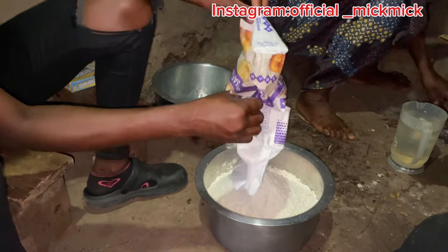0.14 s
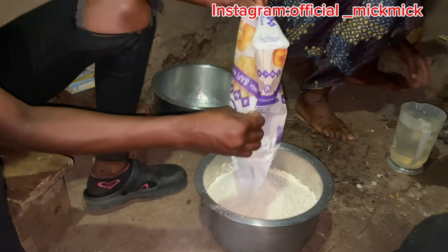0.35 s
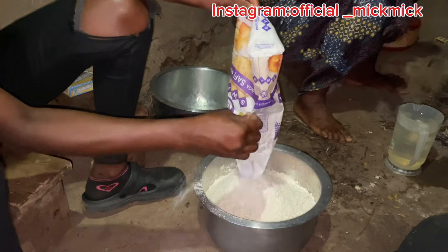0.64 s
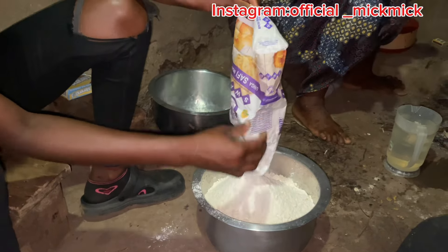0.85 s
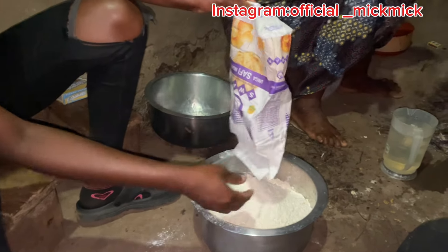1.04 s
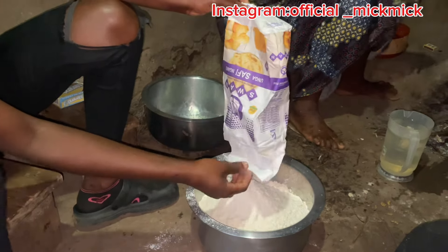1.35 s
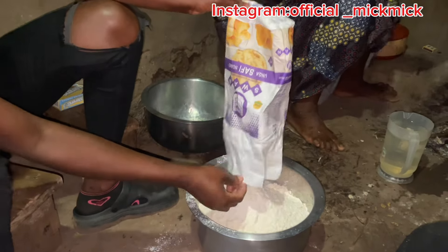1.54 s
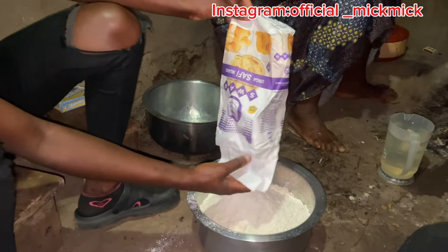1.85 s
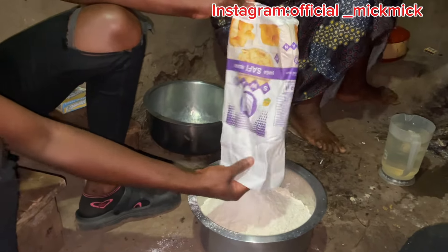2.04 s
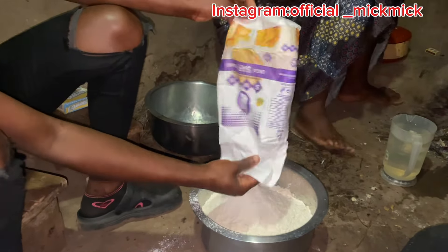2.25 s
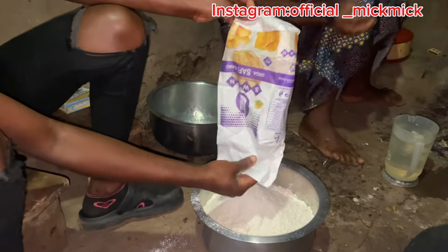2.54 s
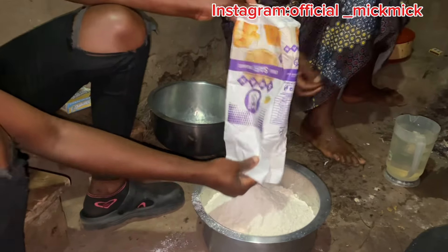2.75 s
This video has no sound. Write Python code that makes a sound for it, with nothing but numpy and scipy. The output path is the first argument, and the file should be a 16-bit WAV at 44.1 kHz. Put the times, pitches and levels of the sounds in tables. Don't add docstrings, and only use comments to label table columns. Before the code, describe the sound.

Close crisp paper rustling and snapping with dull hollow booms from the bag, a short lull with thin distant chirps, then busier crinkling to a loud final shake, heard by a phone in a small hard-walled room.

```python
import sys
import numpy as np
from scipy import signal
from scipy.fft import rfft, irfft, next_fast_len
from scipy.io import wavfile
from scipy.ndimage import uniform_filter1d, map_coordinates

SR = 44100
rng = np.random.default_rng(int(sys.argv[2]) if len(sys.argv) > 2 else 0)


def makeup_ratio(level_db):
    decades = np.asarray(level_db, float) / 20
    return 10 ** decades


def wav_out(sig):
    wavfile.write(sys.argv[1], SR, np.round(np.clip(np.atleast_2d(sig).T, -1, 1) * 32767).astype(np.int16))


N = 127890
T = np.arange(N) / SR

# pitch in Hz, width in Hz, level in dB.
BAG = [(72.7, 8, -7), (165, 11.6, 8), (279, 29.4, -6.5), (392, 83, 1), (449, 317, -8)]


def paper():
    # frequency in Hz, level in dB.
    paper_colour = [(300, -16.5), (700, -0.5), (1100, 6.5), (3000, 1.5), (5000, 1), (7800, -2), (13500, -4)]
    open_rustle, hollow_rustle = rustle()
    bare = open_rustle + snaps()
    return 1.81 * filtered(bare, lambda f: makeup_ratio(along(paper_colour, f))) + hollow_rustle


def rustle():
    # peak in seconds, level in dB, rise in seconds, t60 in seconds.
    shakes = [(.002, -61.5, 0.012, 0.18), (0.051, -44, 0.06, 0.18), (.085, -61.5, 0.11, 0.087),
              (.2, -84, 0.015, 0.05), (0.229, -38.5, 0.052, 0.12), (0.409, -46.5, 0.1, 0.15),
              (0.495, -51, 0.035, 0.14), (0.516, -38, 0.049, 0.13), (0.753, -64, 0.15, 0.12),
              (.885, -75.5, 0.01, 0.058), (1.301, -59.5, 0.094, 0.32), (1.343, -68, 0.0043, 0.053),
              (1.457, -46, 0.069, 0.13), (1.497, -52, 0.009, 0.052), (1.662, -74, 0.0067, 0.26),
              (1.714, -58, 0.015, 0.14), (1.779, -63, 0.18, 1), (1.925, -56, 0.029, 0.18),
              (2.004, -41.5, 0.065, 0.26), (2.043, -43, 0.054, 0.098), (2.224, -45, 0.09, 0.13),
              (2.266, -50, 0.21, 0.023), (2.348, -37.5, 0.064, 0.11), (2.469, -54, 0.075, 0.022),
              (2.514, -44.5, 0.11, 0.067), (2.618, -37, 0.095, 0.13), (2.718, -47.5, 0.026, 0.039),
              (2.757, -38.5, 0.073, 0.085), (2.866, -30, 0.067, 0.08)]
    # time in seconds, level in dB.
    wall_freedom = [(0, 3.5), (1.2, -11), (1.95, 2), (2.06, 1), (2.14, -5), (2.9, -8.5)]
    dull_hz, top_hz = 2500, 7820
    wall_hz, wall_gain, hollow_db = 883, 2.18, 12.5

    grains = crackle(hiss=0.073)
    full = grains * sum(makeup_ratio(db) * swell(s, rise, t60) for s, db, rise, t60 in shakes)
    late = grains * sum(makeup_ratio(db) * swell(s, 0.46 * rise, 1.45 * t60) for s, db, rise, t60 in shakes)

    dull = filtered(full, lambda f: 1 / (1 + (f / dull_hz) ** 2))
    bright = filtered(late, lambda f: 1j * f / (dull_hz + 1j * f) / (1 + (f / top_hz) ** 2))
    freed = full * makeup_ratio(np.interp(T, *np.transpose(wall_freedom)))
    wall = filtered(freed, lambda f: wall_gain * peak(f, wall_hz, wall_hz / 10))
    hollow = makeup_ratio(hollow_db) * filtered(full, resonances(BAG[2:]))
    return dull + wall + bright, hollow


def snaps():
    # start in seconds, peak in dB, pitch in Hz, t60 in seconds, rise in seconds.
    creases = [(0.0243, -44, 2220, 0.056, .002), (0.0315, -38, 2040, 0.048, .004),
               (.192, -71, 1500, 0.038, .001), (0.21, -51, 2500, .05, .006), (.221, -22, 3780, 0.058, .005),
               (.371, -33.5, 1680, 0.09, .006), (0.483, -42, 3400, 0.042, .004),
               (0.5036, -28.5, 2900, .08, .005), (0.741, -54, 2790, .08, 0.0067),
               (0.8033, -57, 4060, 0.073, .001), (1.2593, -50, 1520, 0.073, .005),
               (1.3207, -35.5, 3230, 0.1, .001), (1.3913, -39, 1740, 0.021, .0005),
               (1.4322, -31, 2780, 0.087, .001), (1.445, -34.5, 2680, 0.13, .003),
               (1.6042, -44, 3170, 0.045, .0005), (1.6128, -49, 4950, 0.048, .001),
               (1.6428, -39, 3330, 0.047, .0005), (1.6529, -38, 3920, 0.048, .001),
               (1.7287, -29, 2380, 0.039, .001), (1.8298, -43.5, 2350, 0.044, .0005),
               (1.9, -40.5, 3270, 0.1, 0.0034), (1.9671, -37.5, 2200, 0.076, .001),
               (1.9755, -27.5, 2800, 0.02, .001), (2.0166, -27, 1850, 0.071, .002),
               (2.1837, -36, 1550, 0.12, 0.0022), (2.324, -44, 1400, 0.055, 0.0017),
               (2.339, -23, 2200, 0.044, .003), (2.4428, -40, 1185, 0.057, .0005),
               (2.498, -58, 2300, .05, .002), (2.594, -32.5, 2500, 0.066, .003),
               (2.5996, -28.5, 3100, 0.066, .002), (2.619, -32.5, 2920, 0.086, .003),
               (2.715, -50, 4460, .06, .003), (2.73, -43, 3100, 0.035, .001),
               (2.7427, -48, 2280, 0.036, .001), (2.84, -28, 3500, .05, 0.0048),
               (2.8607, -18, 3260, 0.065, .002)]
    snap_db, tick = -8.5, 0.5
    ring_gain, ring_q, ring_share = 3.7, 12.2, 0.85
    overtone_gain = 0.2

    tearing = crackle(hiss=0.64)
    ratios = rng.uniform(1.1, 3.3, (len(creases), 3))
    out = np.zeros(N)
    for (s, db, hz, t60, rise), ratio in zip(creases, ratios):
        cut = slice(round(s * SR), round(s * SR) + SR // 4)
        burst = (tearing * swell(s + rise, rise, t60))[cut].copy()
        burst[round(rise * SR)] += tick
        brief = burst * makeup_ratio(-60 * T[:len(burst)] / (ring_share * t60 + 0.0058))

        def broad(f):
            return (1j * f / (0.5 * hz + 1j * f)) ** 2 / (1 + 1j * f / (3 * hz))

        def panel(f):
            overtones = sum(peak(f, r * hz, hz / ring_q) for r in ratio)
            return ring_gain * (peak(f, hz, hz / ring_q) + overtone_gain * overtones)

        out[cut] += makeup_ratio(db + snap_db) * (filtered(burst, broad) + filtered(brief, panel))
    return out


def crackle(hiss):
    grains_per_s, spread_db = 3200, 3.5
    chance, sign, size = rng.random((3, N))
    sizes = makeup_ratio(-spread_db * np.log(size + 0.0036))
    clicks = (chance < grains_per_s / SR) * np.sign(sign - 0.5) * sizes
    return unit(unit(clicks) + hiss * rng.standard_normal(N))


def bag_boom():
    # start in seconds, level in dB, pitch in Hz.
    booms = [(.044, -43, 431), (.048, -41.5, 283), (.075, -45.5, 336), (.193, -51, 375), (.221, -38, 398),
             (.222, -39, 292), (.38, -47, 302), (.417, -37.5, 370), (.507, -32, 279), (.508, -61, 406),
             (.508, -22, 878), (.6, -52.5, 201), (.64, -56, 277), (1.008, -63, 292), (1.258, -57.5, 410),
             (1.474, -61, 320), (1.44, -69, 790), (1.915, -43, 950), (1.975, -33, 880), (2.008, -35, 370),
             (2.03, -32, 930), (2.045, -35.5, 332), (2.193, -40.5, 392), (2.312, -46.5, 360),
             (2.353, -46.5, 254), (2.58, -41, 383), (2.74, -43.5, 291), (2.86, -35.5, 400)]
    return drum(booms, cycles=23, flutter=0.26, cavity=BAG[2:])


def room_thud():
    # start in seconds, level in dB, pitch in Hz.
    thuds = [(.226, -48, 66), (.51, -36, 165), (.518, -35.5, 81.2), (.64, -59, 73.7), (.84, -57, 67.6),
             (1.094, -68, 232), (1.096, -62, 473), (1.1, -69, 95), (1.3, -61.5, 71.6), (1.47, -53.5, 79),
             (1.74, -58.5, 83), (2.012, -39.5, 165), (2.228, -40.5, 98), (2.32, -39.5, 164),
             (2.35, -41, 117), (2.52, -43, 83.5), (2.588, -37.5, 77.2), (2.742, -42, 77.6),
             (2.845, -33, 181), (2.847, -29, 77)]
    # peak in seconds, level in dB, rise in seconds, t60 in seconds.
    pumps = [(.07, -62, .06, 1), (0.248, -47, 0.055, 0.2), (.4, -61, .04, 0.26), (.56, -52.5, 0.13, 0.62),
             (.86, -71, 0.097, 0.46), (1.3, -64.5, 0.099, 0.51), (1.49, -55.5, 0.063, 0.18),
             (1.77, -68, 0.21, .4), (2.041, -41.5, 0.035, 0.37), (2.24, -43.5, 0.098, 0.26),
             (2.361, -46.5, .06, 0.32), (2.53, -55, 0.11, 0.22), (2.61, -46, 0.065, 0.36),
             (2.78, -39.5, 0.09, 0.46), (2.87, -44, 0.064, 0.24)]
    # frequency in Hz, level in dB per Hz.
    pump_colour = [(30, 4), (75, -1), (150, -2.5), (260, -7.5), (500, -14), (1000, -50)]
    rumble = unit(filtered(rng.standard_normal(N), lambda f: makeup_ratio(along(pump_colour, f))))
    pumped = rumble * sum(makeup_ratio(db) * swell(s, rise, t60) for s, db, rise, t60 in pumps)
    return drum(thuds, cycles=16.8, flutter=0.31, cavity=BAG) + pumped


def drum(events, cycles, flutter, cavity):
    rise_cycles = 2.24
    tone, strength = np.zeros(N), np.zeros(N)
    for s, db, hz in events:
        rise = rise_cycles / hz
        shape = makeup_ratio(db) * swell(s + rise, rise, cycles / hz)
        tone += shape * np.sin(2 * np.pi * hz * (T - s))
        strength += shape
    return tone + flutter * 10 * filtered(strength * rng.standard_normal(N), resonances(cavity))


def bird():
    # start in seconds, length in seconds, first pitch in Hz, last pitch in Hz, level in dB.
    chirps = [
        (0.852, 0.049, 5235, 5260, -74),
        (0.918, 0.077, 4600, 3870, -74),
        (0.949, 0.051, 4560, 4620, -72),
        (0.981, 0.076, 4060, 3820, -75.5),
        (1.103, .02, 5240, 5180, -75),
        (1.138, 0.063, 5250, 5420, -76.5),
        (1.192, 0.031, 4420, 4370, -71.5),
    ]
    out = np.zeros(N)
    for s, long, first_hz, last_hz, db in chirps:
        progress = np.clip((T - s) / long, 0, 1)
        phase = 2 * np.pi * np.cumsum(first_hz + (last_hz - first_hz) * progress) / SR
        out += makeup_ratio(db) * np.sin(np.pi * progress) ** 0.49 * np.sin(phase)
    return out * (1 + 6 * uniform_filter1d(rng.standard_normal(N), size=150))


def room(x):
    # frequency in Hz, t60 in seconds.
    room_decay = [(200, 0.24), (4000, 0.17), (10000, 0.15)]
    hop, delay = 6000, 130
    out = np.zeros((2, N + SR))
    for start in range(0, N, hop):
        hz, t, z = signal.stft(rng.standard_normal((2, SR // 3)), SR, nperseg=256)
        fade = makeup_ratio(-60 * t / along(room_decay, hz)[:, None])
        tail = signal.istft(z * fade, SR, nperseg=256)[1]
        wet = signal.fftconvolve(x[None, start:start + hop], tail / np.linalg.norm(tail[0]), axes=1)
        out[:, start + delay:start + delay + wet.shape[1]] += wet
    return out[:, :N]


def air(loud):
    # frequency in Hz, level in dB per Hz.
    air_colour = [(25, 20), (81, -6.5), (300, -6), (600, -12), (1300, -17.5), (4500, -12), (7000, -17.5),
                  (13500, -26)]
    # time in seconds, level in dB.
    lulls = [(0, -2), (.8, -2), (.92, -5), (1.08, -1), (1.2, -7), (1.3, 1), (1.57, -5.5), (1.65, -3.5),
             (1.9, 7), (2.15, -5)]
    air_db, wobble_db, patch_db = -64.5, 2.5, 2
    hang_db, hang_t60_s = -34, 2.56

    fade = makeup_ratio(-120 / (hang_t60_s * SR))
    recent_power = signal.lfilter([10 / SR], [1, -fade], loud ** 2)
    hang = np.sqrt(np.abs(recent_power)) * makeup_ratio(hang_db) * 10

    z = signal.stft(rng.standard_normal((2, N)), nperseg=512)[2]
    patches = uniform_filter1d(rng.standard_normal(z.shape[1:]), size=10, axis=0)
    patches = uniform_filter1d(patches, size=10, axis=1)
    patchy = signal.istft(z * makeup_ratio(patch_db * unit(patches)), nperseg=512)[1][:, :N]
    noise = unit(filtered(patchy, lambda f: makeup_ratio(along(air_colour, f))))
    drift_db = wobble_db * wobble(8.96) + np.interp(T, *np.transpose(lulls))
    return (makeup_ratio(air_db) + hang) * makeup_ratio(drift_db) * noise


def unit(x):
    return x / np.sqrt(np.mean(x ** 2) + 1e-20)


def along(points, hz):
    f, v = np.transpose(points)
    return np.interp(np.log(hz + 1), np.log(f + 1), v)


def filtered(x, response):
    n = x.shape[-1]
    m = next_fast_len(n + 8192)
    return irfft(rfft(x, m) * response(np.fft.rfftfreq(m, 1 / SR)), m)[..., :n]


def peak(f, hz, width_hz):
    return 1j * f * width_hz / (hz * hz - f * f + 1j * f * width_hz + 1e-9)


def resonances(modes):
    return lambda f: sum((-1) ** k * makeup_ratio(db) * peak(f, hz, width)
                         for k, (hz, width, db) in enumerate(modes))


def swell(s, rise, t60):
    up = np.clip(1 + (T - s) / max(rise, .001), 0, 1)
    return up * up * makeup_ratio(-60 * np.clip(T - s, 0, 9) / max(t60, .005))


def wobble(rate):
    return map_coordinates(rng.standard_normal(100), [T * rate])


def scene():
    wet_db, low_wet_db = -2.5, -14
    sway_s = .0001
    boom, thud = bag_boom(), room_thud()
    crisp, far = paper(), bird()
    wet = room(makeup_ratio(wet_db) * crisp + makeup_ratio(low_wet_db) * (boom + thud / 2) + far / 2)
    lag = sway_s * SR * wobble(7) / 2
    near = np.array([map_coordinates(crisp, [np.arange(N) + side * lag]) for side in (1, -1)])
    return near + boom + thud + far + wet + air(crisp)


def band_limit(x):
    return signal.sosfilt(signal.butter(12, 13990, fs=SR, output="sos"), x)


def record(dry):
    # frequency in Hz, level in dB.
    left_port = [(500, 2.5), (660, -7), (900, 2.5), (6500, 2), (7880, -0.5), (8060, 7.5), (9500, -2.5),
                 (12800, -34)]
    right_port = [(500, 4.5), (620, -2), (880, 2), (6500, -3), (7800, -9), (9500, -7), (11000, -9),
                  (12800, -10)]
    # frequency in Hz, level in dB.
    treble = [(9500, 0), (10500, -6.5), (12800, -5)]
    # frequency in Hz, lead in radians.
    left_leads = [(600, 0), (860, 1.8), (1150, 3.1), (1460, 3.6), (2760, .4), (5000, .5), (8180, -9.6),
                  (13500, -37.6)]
    top_hz, low_hz, mono_hz = 13000, 58, 557

    def ports(f):
        lead = np.exp(.5j * along(left_leads, f))
        top = 0.072 + 1 / (1 + (f / top_hz) ** 60)
        both = makeup_ratio(along(treble, f)) * top / (1 + (low_hz / (f + 1)) ** 4)
        return np.array([makeup_ratio(along(left_port, f)) * lead, makeup_ratio(along(right_port, f)) / lead]) * both

    left, right = filtered(dry, ports)
    mid = (left + right) / 2
    side = filtered((left - right) / 2, lambda f: .003 + 1 / (1 + (mono_hz / (f + 1)) ** 14))
    return band_limit(np.array([mid + side, mid - side]))


dry = scene()
out = record(dry)
wav_out(out)
```